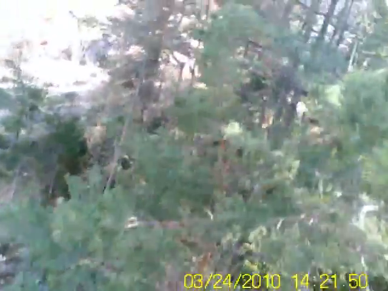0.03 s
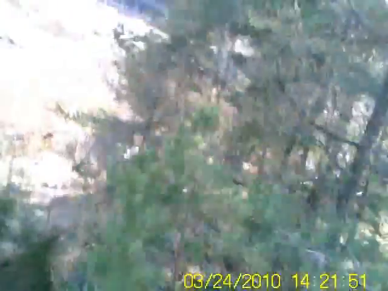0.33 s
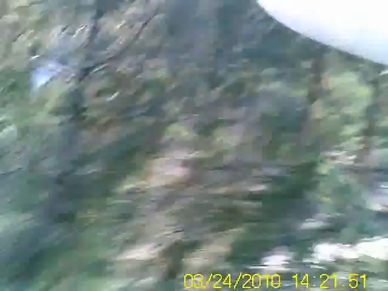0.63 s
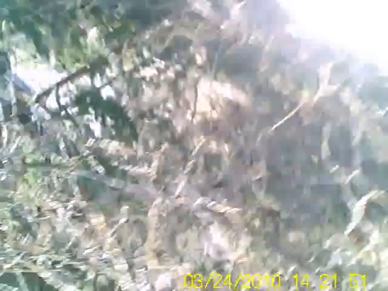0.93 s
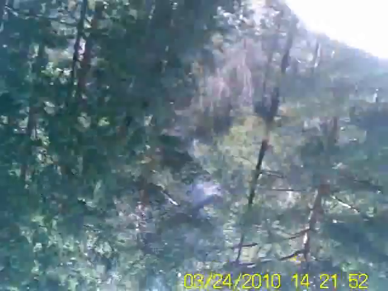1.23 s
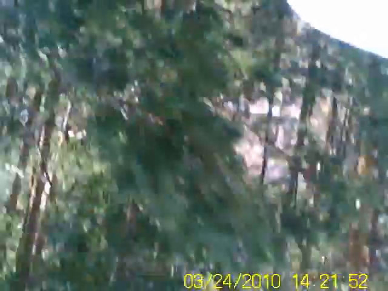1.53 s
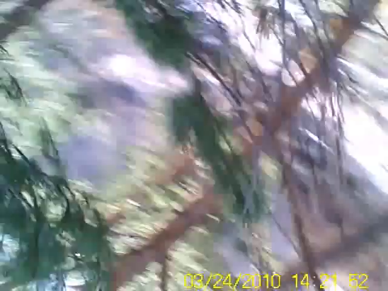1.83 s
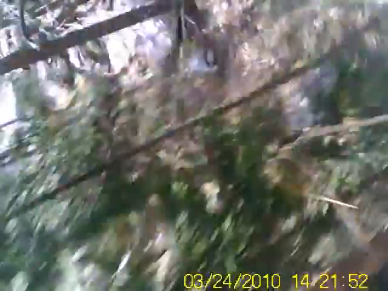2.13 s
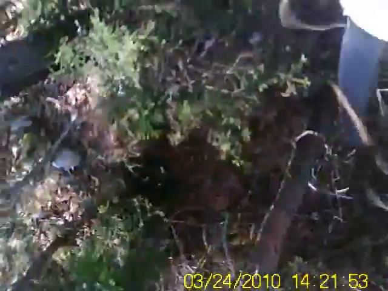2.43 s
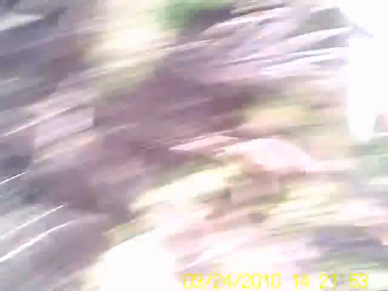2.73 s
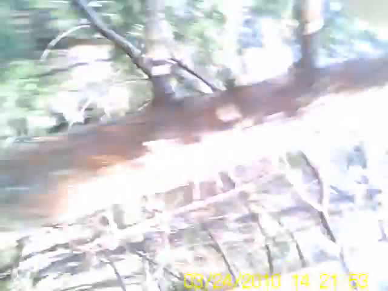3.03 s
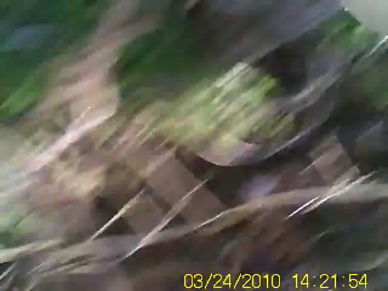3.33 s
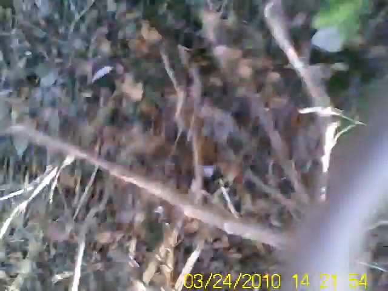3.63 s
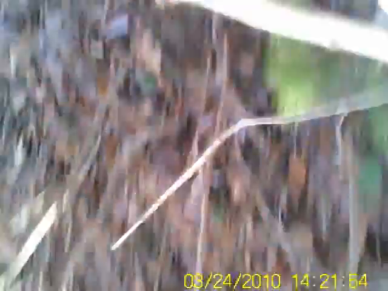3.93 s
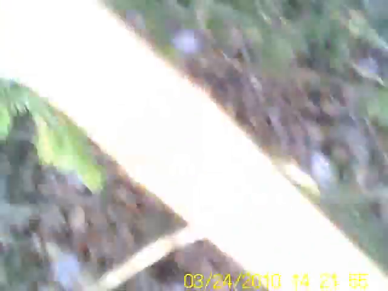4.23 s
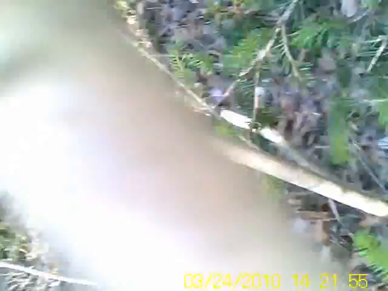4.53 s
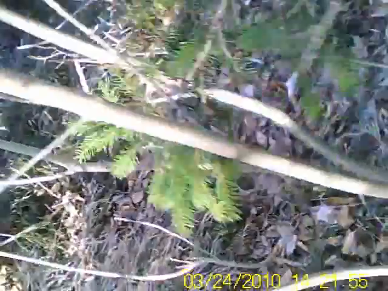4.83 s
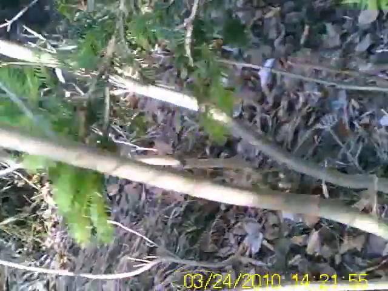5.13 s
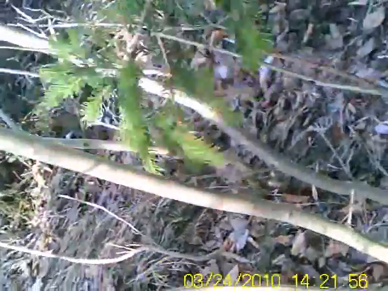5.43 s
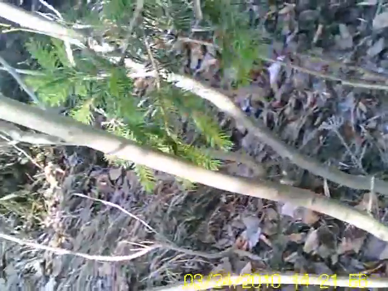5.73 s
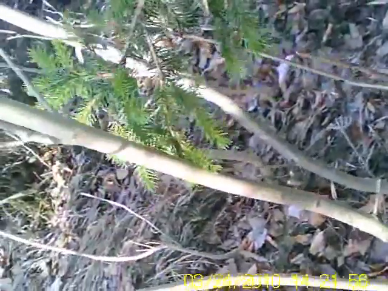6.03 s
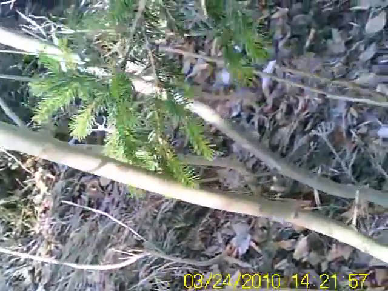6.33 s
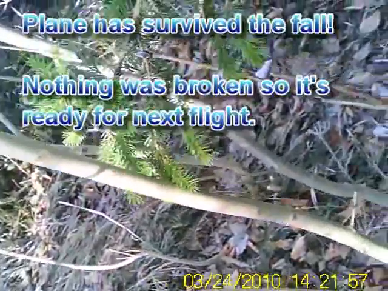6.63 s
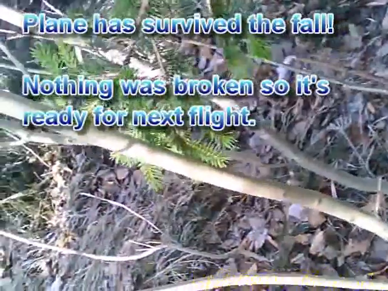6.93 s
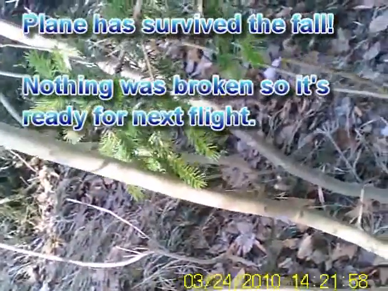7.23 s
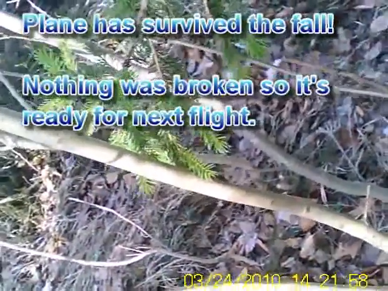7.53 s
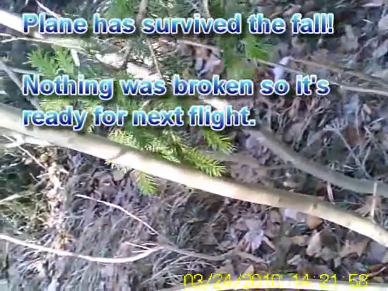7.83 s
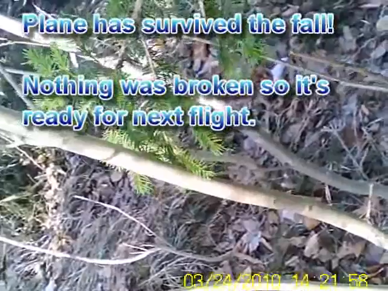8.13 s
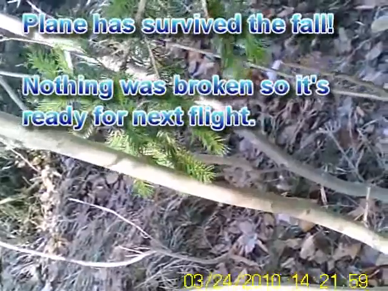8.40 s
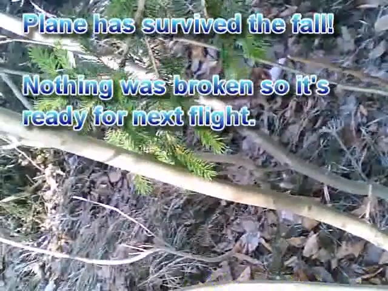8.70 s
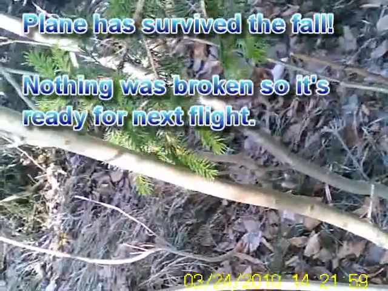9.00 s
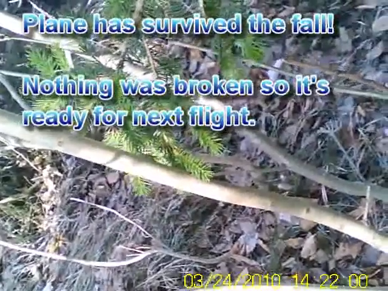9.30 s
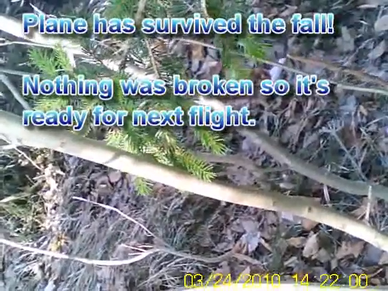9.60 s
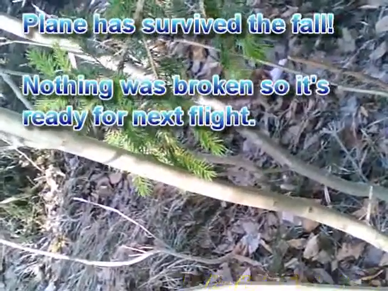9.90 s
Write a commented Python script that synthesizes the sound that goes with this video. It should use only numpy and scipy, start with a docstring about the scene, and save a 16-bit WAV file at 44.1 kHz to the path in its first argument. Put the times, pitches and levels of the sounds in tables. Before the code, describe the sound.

A small model plane drones, crashes through scraping branches and settles, then its servos tick and whirr, heard from on board.

```python
"""Among conifers, a small electric model plane crashes, heard from a camera on its own airframe.
The propeller drones in rushing air, windmills when the power is cut, and stops. Branches strike the
tumbling plane and ring its foam wing; needles scrape over it and bark squeaks against it by friction.
It settles in a bush, where a servo jitters in step with the radio frames and its gears creak,
until the servos whirr and shake the airframe."""
import sys
import numpy as np
from scipy import signal
from scipy.fft import rfft, irfft, next_fast_len
from scipy.io import wavfile
from scipy.ndimage import uniform_filter1d

SR = 44100
rng = np.random.default_rng(int(sys.argv[2]) if len(sys.argv) > 2 else 0)


def inscribe(sig):
    """Save sig as 16-bit PCM at rate SR to the path in sys.argv[1].

    A 1-D sig is mono; a 2-D sig holds one channel per row.
    Samples are clipped to [-1, 1] before scaling.
    """
    pcm = np.round(np.clip(np.atleast_2d(sig).T, -1, 1) * 32767)
    wavfile.write(sys.argv[1], SR, pcm.astype(np.int16))


N = 439236
TIME = np.arange(N) / SR
AGE = TIME[:8192]   # time since the onset of a short event [s]
GLIDE_END_S = 1.03   # the first branches take the plane's speed


def from_db(db):
    """Amplitude ratio of a level in decibels."""
    return 10 ** (np.asarray(db) / 20)


def unit_rms(x):
    """Normalisation to unit mean power."""
    return x / np.sqrt(np.mean(x ** 2) + 1e-20)


def unit_crest(x):
    """Normalisation to unit power over the loudest two milliseconds."""
    return x / np.sqrt(uniform_filter1d(x ** 2, size=88).max())


def in_time(rows):
    """Linear interpolation of each column of a curve at every sample."""
    times, *columns = np.transpose(rows)
    return [np.interp(TIME, times, column) for column in columns]


def during(rows, fade_s=0.028):
    """Trapezoidal gate: one while a curve lasts, fading to zero outside it."""
    start, end = rows[0][0], rows[-1][0]
    return np.interp(TIME, [start - fade_s, start, end, end + fade_s], [0, 1, 1, 0])


def ramp(start, length):
    """Linear rise from zero at start to one, length seconds later."""
    return np.clip((TIME - start) / length, 0, 1)


def drift(rate_hz):
    """Random modulation: low-pass noise of unit rms."""
    step = 40   # samples between computed points
    pole = np.exp(-2 * np.pi * rate_hz * step / SR)
    noise = rng.standard_normal(N // step + 2002)
    slow = signal.lfilter([1], [1, -2 * pole, pole * pole], noise)[2000:]
    return np.interp(np.arange(N) / step, np.arange(len(slow)), unit_rms(slow))


def colour(x, spectrum):
    """Minimum-phase filter with the outline (frequency [Hz], level [dB])."""
    n = 2 * next_fast_len(len(x) // 2 + 1024)
    hz, db = np.transpose(spectrum)
    grid_hz = np.maximum(np.arange(n // 2 + 1) * SR / n, 1)
    gain = from_db(np.interp(np.log(grid_hz), np.log(hz), db))
    cepstrum = irfft(np.log(gain))
    cepstrum[1:n // 2] *= 2   # folding the cepstrum makes the filter causal
    cepstrum[n // 2 + 1:] = 0
    return irfft(rfft(x, n) * np.exp(rfft(cepstrum)))[:len(x)]


def resonate(x, hz, width_hz):
    """Damped resonator with unit gain at its peak."""
    r = np.exp(-np.pi * width_hz / SR)
    feedback = [1, -2 * r * np.cos(2 * np.pi * hz / SR), r * r]
    return signal.lfilter(np.array([1, 0, -1]) * (1 - r * r) / 2, feedback, x + 1e-18)


def grains(per_s, spread_db, smooth):
    """Shot noise: random clicks of uneven size over a share of smooth noise."""
    sizes = from_db(spread_db * np.minimum(rng.exponential(1, N), 4)) * rng.choice([-1, 1], N)
    clicks = sizes * (rng.random(N) < per_s / SR)
    return unit_rms(clicks) + smooth * rng.standard_normal(N)


def burst(decay_s, tail_db, tail_s):
    """Contact noise: the sum of a strong and a weak exponential decay."""
    envelope = np.exp(-AGE / decay_s) + from_db(tail_db) * np.exp(-AGE / tail_s)
    return rng.standard_normal(len(AGE)) * envelope


def add(out, start, wave):
    """Superposition of a wave from its start time on."""
    i = max(0, round(start * SR))
    out[i:i + len(wave)] += wave[:max(0, N - i)]


# still woods and camera hiss: (frequency [Hz], relative level [dB])
FLOOR_SPECTRUM = [(50, 5), (110, -4.5), (300, -14), (500, -12), (900, -8), (2000, -17), (2900, -26.5),
                  (4000, -23.5), (6500, -27.5), (9500, -27.5), (12500, -36), (15500, -43)]
# the camera's whistle: (frequency [Hz], level [dB])
WHISTLE_TONES = [(5600, -80), (7400, -79), (9600, -85)]


def background(floor_db=-57.5):
    """Noise floor: broadband woods and hiss, with narrow noise bands heard as an unsteady whistle."""
    whistle = sum(from_db(db) * unit_rms(resonate(rng.standard_normal(N), hz, width_hz=20))
                  for hz, db in WHISTLE_TONES)
    return from_db(floor_db) * unit_rms(colour(rng.standard_normal(N), FLOOR_SPECTRUM)) + whistle


def coasting():
    """Loss of drive: zero under power, one once the motor is cut."""
    return ramp(0.6225, 0.019)


# propeller speed: (time [s], blade-passing frequency [Hz])
BLADE_PASSING = [(0.0, 163.3), (0.202, 162.2), (0.304, 181.6), (0.494, 187.1), (0.584, 188), (0.608, 183),
                 (0.65, 187.3), (1.052, 187.2), (1.136, 192), (1.158, 192), (1.188, 184.6), (1.2, 181)]
# propeller tone: (harmonic number, relative level [dB])
BLADE_HARMONICS = [(1, 1.5), (2, -7.5), (3, -11), (4, -23.5), (5, -22.5), (6, -26.5), (8, -28.5),
                   (11, -25.5)]


def propeller(full_speed_hz=187.8, db_per_hz=0.3, flutter_db=4.0, whine_hz=6340, whine_db=-37.5):
    """Periodic blade loading radiates harmonics, weak when windmilling; the motor whines at speed."""
    hz, = in_time(BLADE_PASSING)
    phase = 2 * np.pi * np.cumsum(hz * (1 + 0.0028 * drift(36))) / SR
    speed_db = db_per_hz * (np.minimum(hz, full_speed_hz) - full_speed_hz)
    idle = coasting()
    blades = np.zeros(N)
    for order, db in BLADE_HARMONICS:
        drive_db = -11.0 - 20.5 * idle if order < 3 else -14.5 - 14.5 * idle
        gain = from_db(drive_db + speed_db + db + flutter_db * drift(7.1))
        blades += gain * np.sin(order * phase + rng.uniform(0, 2 * np.pi))
    turning = 1 - ramp(GLIDE_END_S, 0.17)   # branches stop the blades
    band = resonate(rng.standard_normal(N), whine_hz, width_hz=200)
    band = unit_rms(resonate(band, whine_hz, width_hz=200))
    whine = from_db(whine_db) * ramp(0.37, 0.08) * (1 - idle) * band
    return np.sqrt(2) * blades * turning + whine


# rushing air: (frequency [Hz], relative level [dB])
RUSH_SPECTRUM = [(200, -0.5), (700, -2.5), (1000, -5), (1500, -3), (2100, -12.5), (2900, -20.5),
                 (4000, -18), (5500, -25), (7000, -29), (9200, -36.5), (11000, -58), (13000, -39),
                 (15500, -65)]


def airflow(buffet_db=-29.5, rush_db=-12.0, ease_db_per_s=10.0, lump_db=7.0, gust_db=1.0):
    """Turbulence buffets the microphone port under an easing rush; both drop with the power."""
    idle = coasting()
    buffet_spectrum = [(10, 4), (30, -5.5), (120, 7.5), (300, -12.5), (600, -13.0), (1500, -48)]
    low = unit_rms(colour(rng.standard_normal(N), buffet_spectrum))
    high = unit_rms(colour(rng.standard_normal(N) * from_db(gust_db * drift(110)), RUSH_SPECTRUM))
    buffet = low * from_db(buffet_db - 26.0 * idle + lump_db * drift(13))
    rush = high * from_db(rush_db - 20.5 * idle - ease_db_per_s * TIME)
    return (buffet + rush) * (1 - ramp(GLIDE_END_S, 0.053))


# sharp blows of twigs and branches: (time [s], crunch level [dB], snap level [dB])
BLOWS = [(0.277, 4.5, 7.5), (0.362, -27, 7.5), (0.614, -1, -29), (1.18, -8.5, -21), (1.641, -20, -47),
         (1.692, -14.5, -50), (2.236, -7, -21.5), (2.306, -31, -28.5), (2.453, -16, -20.5),
         (2.522, -28, -14), (2.536, -12.5, -19), (2.686, -27.5, -27), (2.715, -25.5, -28.5),
         (3.045, -47, -43), (3.093, -24, -35), (3.37, -15, -40), (3.418, -10, -15.5), (3.474, -3.5, -12),
         (3.531, -14.5, -42), (3.574, -15.5, -44),  (3.684, -8.5, -38), (3.732, -5.5, -33),
         (3.805, -12.5, -40), (3.853, -6, -40), (3.936, -15, -46), (3.87, -9.5, -32), (3.967, -9.5, -43),
         (4.422, -21, -40), (4.556, -22, -33), (5.026, -28, -29), (5.224, -38, -41)]
# crunch of the airframe: (frequency [Hz], relative level [dB])
CRUNCH_SPECTRUM = [(100, -21), (300, -9.5), (600, -5), (1100, 2), (1900, 4), (2200, -2.5), (2900, -15.5),
                   (4000, -16.5), (7000, -34.5), (15000, -54)]
# bright snaps and brushing needles: (frequency [Hz], relative level [dB])
NEEDLE_SPECTRUM = [(2000, -14), (3000, -5), (3700, -2.5), (4600, -8.5), (6300, -11.5), (7600, -21),
                   (9200, -20), (10500, -43), (11700, -42), (13000, -28), (15500, -45)]


def branch_blows(crunch_gain_db=-2.0, snap_gain_db=-7.0, trunk_s=2.5045, trunk_db=-2.0):
    """Impact: brief contact excites a wide band, a snap and a crunch; one hard hit is on a trunk."""
    out = np.zeros(N)
    for start, crunch_db, snap_db in BLOWS:
        crunch = unit_crest(colour(burst(0.0015, -17, 0.016), CRUNCH_SPECTRUM))
        snap = unit_crest(colour(burst(0.0007, -30.5, 0.005), NEEDLE_SPECTRUM))
        add(out, start, from_db(crunch_db + crunch_gain_db) * crunch)
        add(out, start, from_db(snap_db + snap_gain_db) * snap)
    contact = rng.standard_normal(len(AGE)) * np.exp(-np.maximum(AGE - 0.004, 0) / 0.002)
    bark = unit_crest(resonate(contact, hz=2050, width_hz=900))
    bark += 0.02 * unit_crest(colour(contact, NEEDLE_SPECTRUM))
    add(out, trunk_s, from_db(trunk_db) * bark)
    return out


# modes of the foam wing and its spar: (frequency [Hz], bandwidth [Hz], relative level [dB])
WING_MODES = [(427, 30, -6), (587, 32, -3), (990, 54, -1.5), (1480, 110, -5.5), (1735, 27, -2.5),
              (2150, 100, 0), (3310, 180, -7.5), (5700, 83, -4)]


def airframe(contact, ring=0.22):
    """Modal response: contact noise passes through the plane and also rings its wing."""
    modes = sum(from_db(db) * resonate(contact, hz, width) for hz, width, db in WING_MODES)
    return 0.74 * (contact + ring * modes)


# low thumps of the wing, and short hums of the propeller winding down:
# (time [s], level [dB], frequency [Hz])
THUMPS_AND_HUMS = [(0.613, -0.5, 354), (1.16, -21, 195), (1.21, -25.5, 228), (1.771, -15, 95),
                   (2.449, -17, 143), (2.508, -11, 90), (2.547, -15, 140), (2.609, -21, 214),
                   (3.094, -11, 105), (3.138, -16, 98), (4.272, -36, 119), (9.77, -2, 209),
                   (9.785, -16, 387), (9.802, -4.5, 114), (9.818, -9.5, 123), (9.862, -8, 157)]
# bending of the wing: (frequency [Hz], relative level [dB])
FLEX_SPECTRUM = [(18, -22.5), (30, 2.5), (81, -2.5), (140, 1), (202, -5), (237, -7.5), (407, -8.5),
                 (600, -17.5), (780, -49), (1320, -120)]


def thumps_and_hums(gain_db=-2.0, rise_s=0.0013, decay_s=0.0073, rattle=0.44):
    """Damped oscillation: low thumps of the wing, and short hums of the propeller winding down."""
    out = np.zeros(N)
    envelope = np.exp(-AGE / decay_s) * (1 - np.exp(-AGE / rise_s))
    for start, db, hz in THUMPS_AND_HUMS:
        tone = unit_crest(-np.sin(2 * np.pi * hz * AGE) * envelope)
        shake = unit_crest(colour(burst(0.022, -26.0, 0.016), FLEX_SPECTRUM))
        add(out, start, from_db(db + gain_db) * unit_crest(tone + rattle * shake))
    return out


# foam on bark: (start [s], end [s], first frequency [Hz], last frequency [Hz], level [dB])
BARK_RUBS = [(0.693, 0.75, 3380, 3100, -45), (1.24, 1.374, 1760, 730, -43), (2.717, 2.933, 1500, 1350, -50),
             (4.125, 4.182, 1790, 1700, -44), (4.109, 4.353, 1210, 1080, -48.5),
             (4.414, 4.6, 1900, 2300, -44.5), (4.3, 5.3, 3480, 4000, -57), (4.686, 4.842, 5200, 5600, -55)]


def squeaks(gain_db=0.5):
    """Stick-slip oscillation gives a rough, wandering tone that swells and fades."""
    out = np.zeros(N)
    grip = 0.8 + drift(90)
    unsteady = 1 + 0.07 * drift(200)
    for start, end, first_hz, last_hz, db in BARK_RUBS:
        span = slice(int(start * SR), int(end * SR))
        progress = np.clip((TIME[span] - start) / (end - start), 0, 1)
        hz = (first_hz + (last_hz - first_hz) * progress) * unsteady[span]
        phase = 2 * np.pi * np.cumsum(hz) / SR
        out[span] += from_db(db + gain_db) * grip[span] * np.sin(phase) * np.sin(np.pi * progress)
    return out


# boughs dragging over the plane:
# (start [s], duration [s], flex level [dB], scrape level [dB], hiss level [dB], swell [dB])
BOUGH_DRAGS = [(1.038, 0.13, -21.5, -23, -34.5, 16), (1.212, 0.096, -35, -35.5, -51.5, -3),
               (1.327, 0.28, -34.5, -39.5, -62, -6), (1.635, 0.14, -24.5, -25, -39, -8),
               (1.798, .19, -27.5, -32.5, -47, 6.5), (1.996, 0.15, -30, -24.5, -36.5, 10.5),
               (2.153, 0.081, -25.5, -27.5, -38, -1), (2.247, 0.2, -31.5, -34.5, -49.5, -5.5),
               (2.445, 0.22, -30, -33.5, -47.5, -10.5), (2.671, 0.068, -37, -33, -40.5, 5),
               (2.764, 0.092, -39.5, -39.5, -53, -1), (2.857, 0.068, -37.5, -33.5, -55, -0.5),
               (3.091, 0.15, -22.5, -30.5, -45.5, 0), (3.267, 0.12, -34.5, -37.5, -42.5, -9),
               (3.355, 0.081, -20.5, -19.5, -35.5, 1.5), (3.471, 0.2, -22, -22.5, -37, -2),
               (3.684, 0.061, -20.5, -22, -34.5, 0.5), (3.771, 0.035, -24, -20, -36, 0.5),
               (3.843, 0.066, -21.5, -22.5, -42, -6.5), (3.93, 0.1, -30, -23.5, -37, -12.5),
               (4.04, 0.094, -46, -45, -66, -6)]


def bough_contact(grip_s=0.008, let_go_s=0.017):
    """Contact envelopes of flex, scrape and hiss: a bough grips, swells or slackens, and lets go."""
    out = np.zeros((3, N))
    for start, length, flex_db, scrape_db, hiss_db, swell_db in BOUGH_DRAGS:
        hold = from_db(swell_db * (ramp(start, length) - 0.5))
        release = np.exp(-np.clip(TIME - start - length, 0, 1) / let_go_s)
        out += from_db([[flex_db], [scrape_db], [hiss_db]]) * (ramp(start, grip_s) * hold * release)
    return out


# twigs scraping the foam: (frequency [Hz], relative level [dB])
SCRAPE_SPECTRUM = [(120, -12), (300, -4), (600, 5), (1000, 2.5), (1400, 3.5), (1750, 2.5), (2130, -2.5),
                   (2600, -12), (3200, -21), (5000, -41.5), (12000, -63.5)]


def foliage(flex_db=-1.5, scrape_db=-4.0, needle_db=-5.0, twig_db=-14.0, catch_db=3.0, sway_db=2.0):
    """Friction as many tiny impacts: twigs catch and slip, bending the wing, as needles brush it."""
    flex, scrape, hiss = bough_contact()
    catching = from_db(catch_db * (drift(45) - 0.3))
    bending = from_db(flex_db + sway_db * drift(20)) * flex
    wing = unit_rms(colour(grains(900, 2.5, 0.33), FLEX_SPECTRUM))
    skin = unit_rms(colour(grains(2200, 3.6, 0.7) * catching, SCRAPE_SPECTRUM))
    needles = unit_rms(colour(grains(2600, 6.9, 0.81) * catching, NEEDLE_SPECTRUM))
    strikes = np.abs(grains(per_s=22, spread_db=3.1, smooth=0)) + 1e-18
    flicks = signal.lfilter([1], [1, -np.exp(-1 / (0.0025 * SR))], strikes)   # 2.5 ms decay
    twigs = unit_rms(colour(flicks * rng.standard_normal(N), CRUNCH_SPECTRUM))
    scraping = from_db(scrape_db) * skin + from_db(twig_db) * twigs
    return bending * wing + scrape * scraping + from_db(needle_db) * hiss * needles


# the last slow slide through needles: (time [s], swish level [dB], treble level [dB])
SLIDE_LEVELS = [(4.04, -45, -50), (4.082, -43.5, -56.5), (4.398, -43.5, -58), (4.418, -39.5, -48.5),
                (4.534, -45, -50.5), (4.562, -30, -44), (4.57, -40.5, -46), (4.686, -47, -47),
                (4.702, -42.5, -44.5), (5.162, -41.5, -53), (5.194, -53, -70), (5.216, -42.5, -45),
                (5.376, -53, -81), (5.44, -55.5, -72)]
# swish of that slide: (frequency [Hz], relative level [dB])
SWISH_SPECTRUM = [(200, -36), (450, 1), (800, 1.5), (1400, 0.5), (2050, -1), (2900, -20.5), (3600, -17),
                  (4400, -22.5), (5300, -22.5), (6500, -31.5), (9000, -36.5), (10500, -51), (13000, -46),
                  (15500, -51)]


def sliding(flex_db=-8.5, split_hz=2900, jerk_db=1.96):
    """Sliding friction: the bush brakes the wing in small jerks; the swish dulls as it comes to rest."""
    swish_db, treble_db = in_time(SLIDE_LEVELS)
    jerks = from_db(jerk_db * drift(24))
    rub = colour(grains(2500, 1.8, 1.0) * jerks, SWISH_SPECTRUM)
    low, high = (unit_rms(signal.sosfilt(signal.butter(4, split_hz, kind, fs=SR, output="sos"), rub))
                 for kind in ("low", "high"))
    wing = unit_rms(colour(grains(900, 5.9, 0.15) * jerks, FLEX_SPECTRUM))
    swish = from_db(swish_db) * (low + from_db(flex_db) * wing)
    return during(SLIDE_LEVELS) * (swish + from_db(treble_db) * high)


# the plane settles on branches: (time [s], tap level [dB], ring frequency [Hz], shudder level [dB])
TAPS = [(4.57, -38, 547, -41.5), (5.226, -36, 985, -48), (5.303, -33, 1090, -52), (5.33, -42, 497, -56),
        (5.354, -38, 448, -46.5), (5.366, -38, 750, -53), (5.725, -43.5, 975, -55),
        (5.768, -35.5, 1875, -51), (5.886, -42, 985, -53), (5.958, -45.5, 746, -51), (6.08, -41, 1007, -61),
        (6.413, -42.5, 958, -69), (6.818, -47, 980, -62), (6.877, -36, 960, -42)]
# a hollow tap: (frequency [Hz], relative level [dB])
TAP_SPECTRUM = [(100, -32), (300, -16.5), (480, 9.5), (750, 4.5), (1050, 6.5), (1450, -2), (1900, 3),
                (2600, -20), (4000, -21), (9000, -59)]


def settling(tap_gain_db=3.0, ring=0.82, ring_s=0.015, shudder_gain_db=4.0, shudder_s=0.044):
    """Impulse response: each tap rings one resonance of branch or wing and leaves a low shudder."""
    out = np.zeros(N)
    shudder_spectrum = [(30, -37), (70, -11), (160, -13.0), (280, -28), (700, -29.0), (3000, -76)]
    for start, tap_db, hz, shudder_db in TAPS:
        tap = unit_crest(colour(burst(0.005, -6, 0.024), TAP_SPECTRUM))
        note = unit_crest(np.sin(2 * np.pi * hz * AGE) * np.exp(-AGE / ring_s))
        shudder = colour(rng.standard_normal(len(AGE)) * np.exp(-AGE / shudder_s), shudder_spectrum)
        add(out, start, from_db(tap_db + tap_gain_db) * unit_crest(tap + ring * note))
        add(out, start, from_db(shudder_db + shudder_gain_db) * unit_crest(shudder))
    return out


JITTER_START_S, JITTER_END_S = 5.4425, 9.55
FRAME_S = 0.022   # period of the radio frames


def gear_chatter(final_db=-52.0, rise_db_per_s=5.0):
    """Creaking under load: the gears give tiny irregular clicks that grow louder."""
    gate = during([(JITTER_START_S,), (JITTER_END_S,)])
    envelope = from_db(final_db + rise_db_per_s * (TIME - JITTER_END_S)) * gate
    clicks = grains(260, 4.0, 0.1) * from_db(3 * drift(25))
    return envelope * unit_rms(colour(clicks, CRUNCH_SPECTRUM))


# modes of the servo in its mount: (frequency [Hz], bandwidth [Hz], relative level [dB])
CASE_MODES = [(486, 29, -17), (860, 76, -4.5), (1383, 192, -3), (2023, 89, 2), (2620, 190, -11),
              (3507, 126, -8.5), (3955, 180, -10.5), (4760, 87, -15.5), (5500, 52, -26), (5990, 39, -15.5),
              (6920, 180, -107)]


def servo_body(teeth, variation=1, direct=0.045):
    """Structural resonance: gear noise rings case and mount, varying a little with gear position."""
    offsets_db = variation * rng.uniform(-4, 4, len(CASE_MODES))
    detune = 1 + variation * rng.uniform(-0.04, 0.04)
    modes = sum((-1) ** k * from_db(db + offsets_db[k]) * resonate(teeth, hz * detune, width)
                for k, (hz, width, db) in enumerate(CASE_MODES))
    outline = [(200, 2.5), (700, 1.0), (1400, -2), (2200, 1.5), (4000, -4.5), (6400, -2.0),
               (7200, -14.5), (12000, -34)]
    return colour(modes + direct * teeth, outline)


# the hardest servo twitches: (time [s], level [dB])
HARD_TWITCHES = [(5.508, -36.5), (6.0585, -35), (6.103, -36), (6.2794, -37.5), (6.3664, -38.5),
                 (6.4754, -35.5), (6.63, -36), (6.8496, -36), (6.9597, -33.5), (7.005, -33.5),
                 (7.0688, -30.5), (7.444, -31.5), (7.5097, -30.5), (7.6417, -32), (7.6846, -30.5),
                 (7.7752, -33.5), (7.8388, -33), (7.883, -31.5), (7.927, -33), (8.037, -32.5),
                 (8.0825, -31.5), (8.1461, -29.5), (8.2577, -27.5), (8.2793, -28), (8.3679, -34.5),
                 (8.543, -32.5), (8.632, -27), (8.6768, -27.5), (8.765, -33.5), (8.853, -31.5),
                 (8.983, -29), (9.0493, -27), (9.0721, -26.5), (9.1381, -31), (9.205, -29.5),
                 (9.3147, -26.5), (9.3351, -23), (9.401, -23), (9.423, -24), (9.4454, -26)]
# lesser twitches of the restless servo: (time [s], probability per radio frame, level [dB])
LESSER_TWITCHES = [(5.44, .3, -44), (7.3, .5, -41.5), (8.3, .35, -46), (8.5, .95, -33), (8.8, .6, -36),
                   (9.45, .9, -30), (9.54, .3, -44)]


def servo_jitter(gain_db=-4.5, kick_s=0.0017, coast_db=-8.5, coast_s=0.0065, idle_db=-19.5):
    """Backlash: a radio frame kicks the motor, and the gears take up their slack, then coast."""
    out = np.zeros(N)
    age = AGE[:2048]
    kick = (age / kick_s) * np.exp(-(age / kick_s) ** 2)
    coast = from_db(coast_db) * np.exp(-age / coast_s) * (1 - np.exp(-age / kick_s))
    frames = np.arange(JITTER_START_S, JITTER_END_S, FRAME_S)
    chance, lesser_db = (curve[(frames * SR).astype(int)] for curve in in_time(LESSER_TWITCHES))
    frames_to_hard = np.round((np.array(HARD_TWITCHES)[:, 0] - frames[:, None]) / FRAME_S)
    free = (frames_to_hard != 0).all(axis=1)
    resting = (frames_to_hard == 1).any(axis=1)   # the frame before a hard twitch
    idle = resting | (rng.random(len(frames)) > chance)   # these frames barely stir the motor
    frame_db = lesser_db + idle_db * idle + 2.5 * rng.standard_normal(len(frames))
    for start, db in [*HARD_TWITCHES, *zip(frames[free], frame_db[free])]:
        teeth = rng.standard_normal(len(age)) * (kick + coast)
        add(out, start, from_db(db + gain_db) * unit_crest(servo_body(teeth)))
    return out


# effort of the running servos: (time [s], level [dB])
SERVO_EFFORT = [(9.55, -63), (9.582, -23.5), (9.644, -19.5), (9.658, -27.5), (9.74, -19.5), (9.87, -20),
                (9.882, -37), (9.902, -18), (9.96, -27)]
# rasp of the gears: (frequency [Hz], relative level [dB])
RASP_SPECTRUM = [(250, -23), (500, -3.5), (1000, -10.5), (1450, -17), (1700, -2.5), (2080, 11),
                 (2900, -37.5), (3500, -26), (5000, -19), (6400, -20), (7200, -26), (8500, -30),
                 (10500, -50), (15500, -53)]
# servo strokes: (start [s], end [s], first frequency [Hz], last frequency [Hz], level [dB])
SERVO_STROKES = [(9.621, 9.643, 845, 1153, -19.5), (9.716, 9.758, 845, 1196, -14),
                 (9.785, 9.811, 902, 1164, -17), (9.89, 9.915, 925, 1112, -20),
                 (9.934, 9.953, 934, 1067, -26)]
# tone of the meshing teeth: (harmonic number, relative level [dB])
MESH_HARMONICS = [(1, -3), (2, 2.5), (3, -8), (4, -12), (5, -14.5), (6, -13.5), (7, -27)]


def servo_run(rasp_gain_db=-0.5, pulse_db=2.5):
    """Gear meshing: teeth rasp in step with the radio frames; each stroke's pitch rises with speed."""
    pulsing = from_db(pulse_db * np.cos(2 * np.pi * (TIME - 9.594) / FRAME_S))
    teeth = grains(4000, 3.6, 0.21) * pulsing
    case = unit_rms(servo_body(teeth, variation=0))
    rasp = unit_rms(unit_rms(colour(teeth, RASP_SPECTRUM)) + 2.15 * case)
    effort_db, = in_time(SERVO_EFFORT)
    out = from_db(effort_db + rasp_gain_db) * during(SERVO_EFFORT) * rasp
    unsteady = 1 + 0.04 * drift(500)[:len(AGE)]
    load = unit_rms(from_db(3 * drift(200)))[:len(AGE)]
    for start, end, first_hz, last_hz, db in SERVO_STROKES:
        progress = np.clip(AGE / (end - start), 0, 1)
        hz = (last_hz + (first_hz - last_hz) * (1 - progress) ** 2) * unsteady
        phase = 2 * np.pi * np.cumsum(hz) / SR
        mesh = sum(from_db(order_db) * np.sin(order * phase + rng.uniform(0, 2 * np.pi))
                   for order, order_db in MESH_HARMONICS)
        envelope = np.sqrt(np.abs(np.sin(np.pi * progress)))
        add(out, start, from_db(db) * unit_rms(mesh) * load * envelope)
    return out


def scene():
    """Superposition: every source reaches the microphone directly or through the airframe."""
    flight = propeller() + airflow()
    crash = airframe(foliage() + sliding() + branch_blows()) + squeaks() + thumps_and_hums() + settling()
    servos = servo_jitter() + gear_chatter() + servo_run()
    return (flight + crash + servos + background())[None]


def record(dry, treble_hz=10500, stopband_hz=16500, dc_offset=-0.014):
    """Asymmetric saturation: the microphone overloads sooner upward; low-pass filters cut the top."""
    limit = np.where(dry > 0, 0.55, 1.05)
    squashed = dry / (1 + (dry / limit) ** 4) ** 0.25
    dulled = signal.sosfilt(signal.butter(2, treble_hz, fs=SR, output="sos"), squashed)
    return signal.sosfilt(signal.cheby2(12, 60, stopband_hz, fs=SR, output="sos"), dulled) + dc_offset


dry = scene()
out = record(dry)
inscribe(out)
```